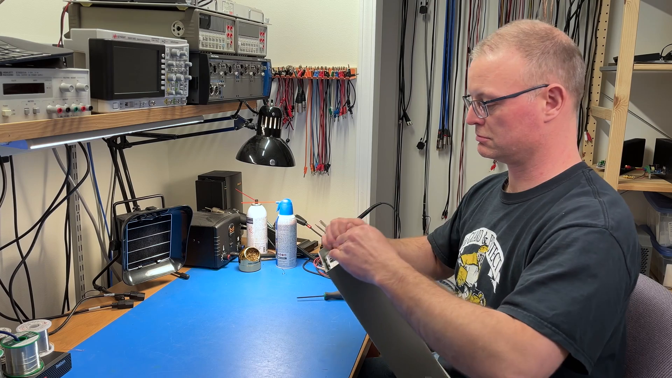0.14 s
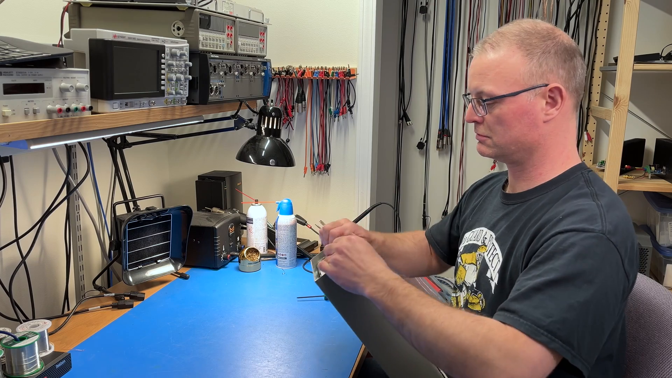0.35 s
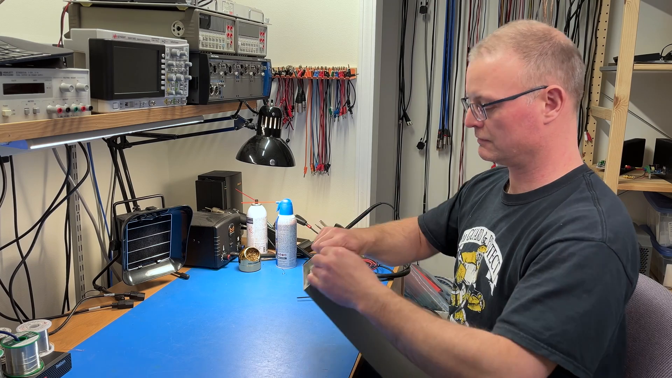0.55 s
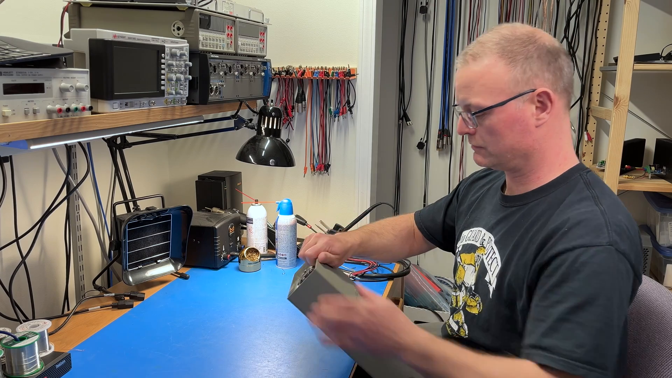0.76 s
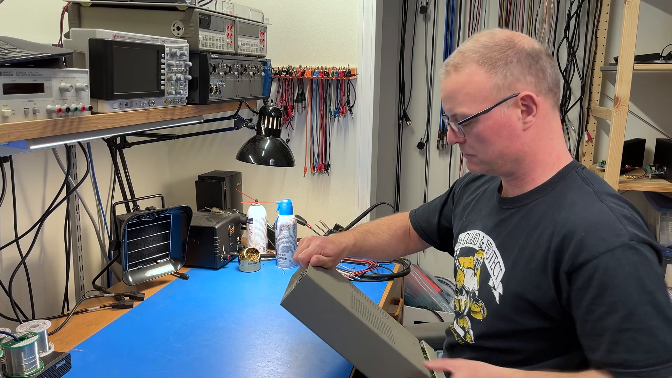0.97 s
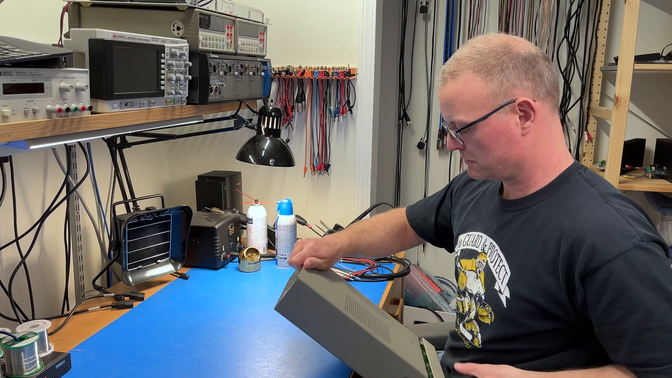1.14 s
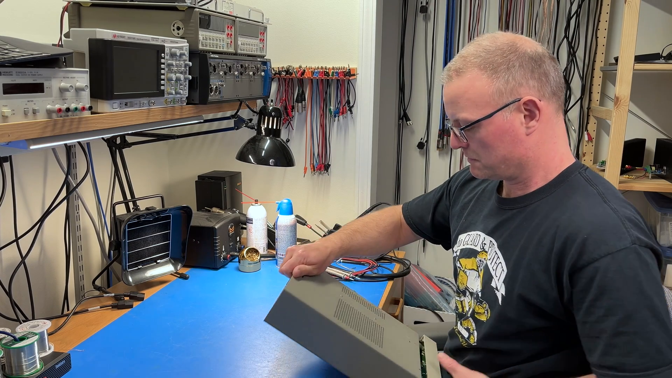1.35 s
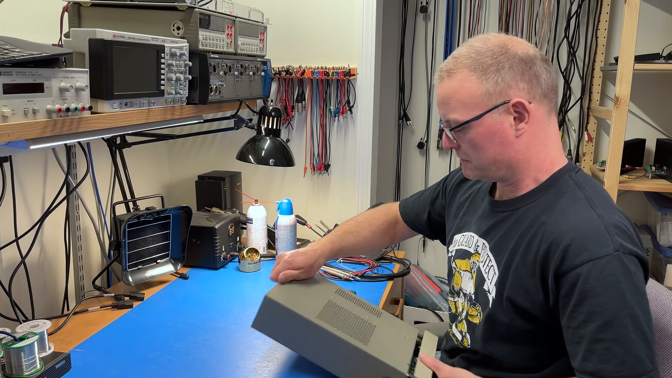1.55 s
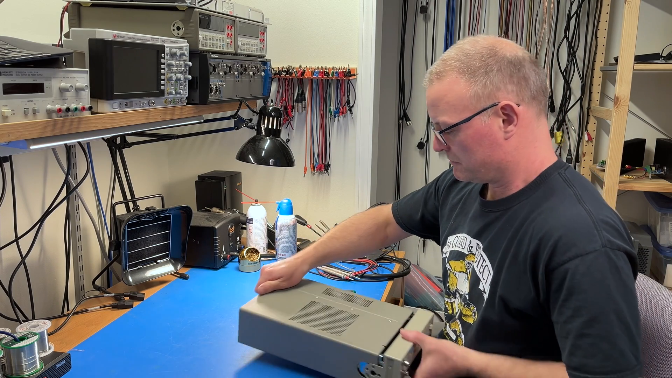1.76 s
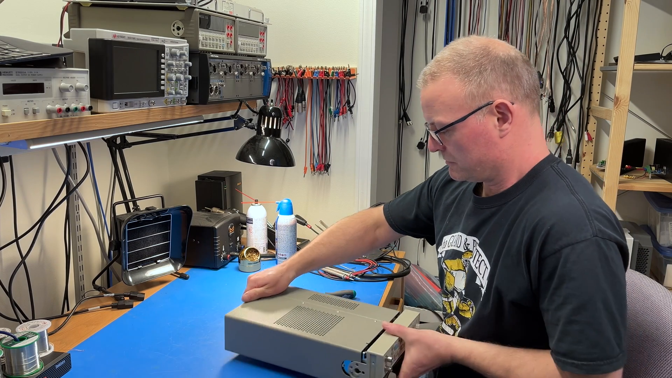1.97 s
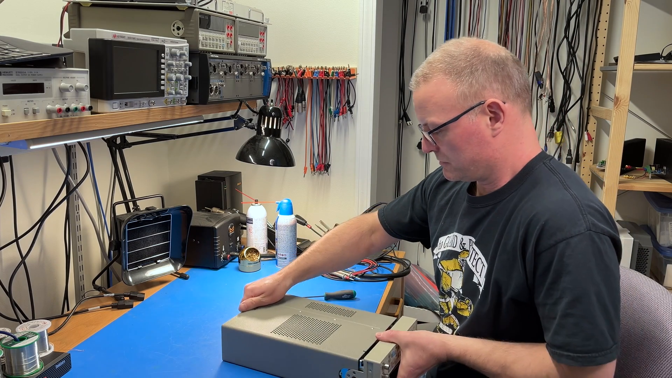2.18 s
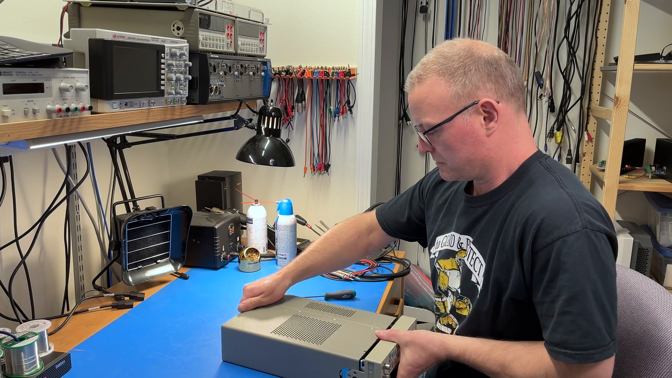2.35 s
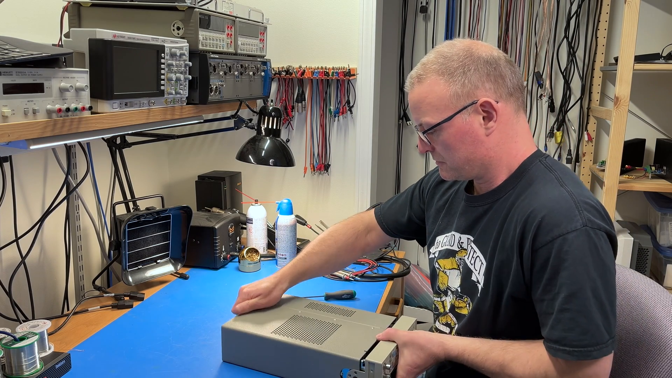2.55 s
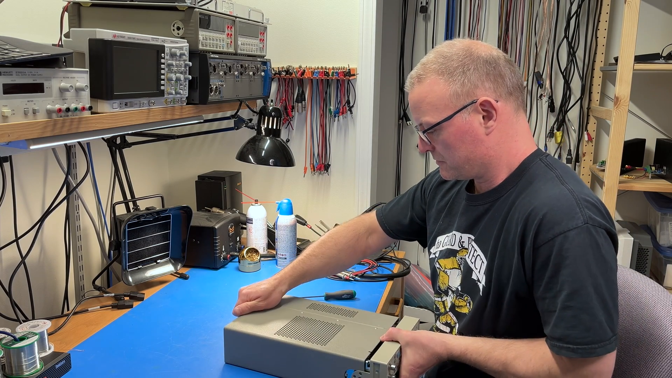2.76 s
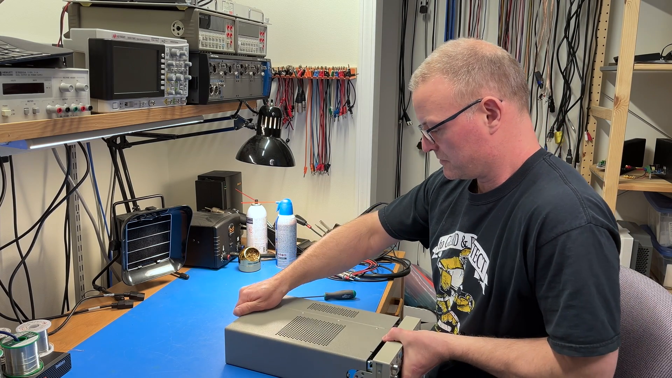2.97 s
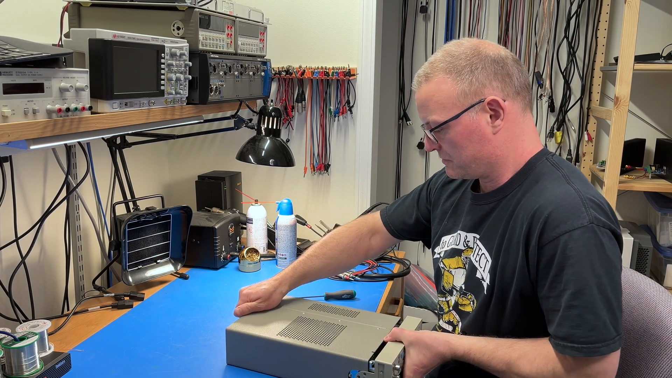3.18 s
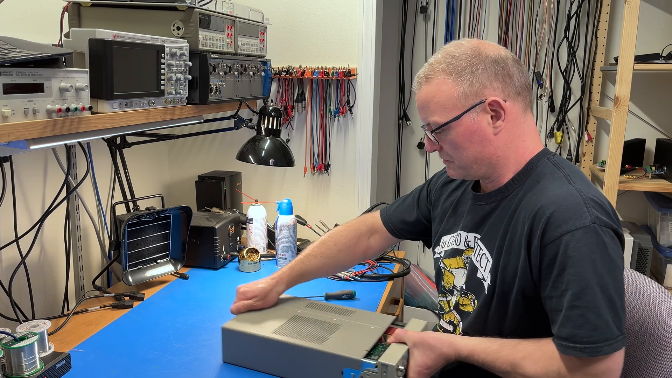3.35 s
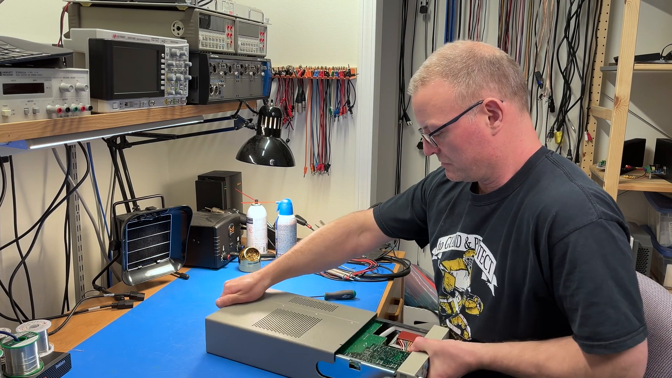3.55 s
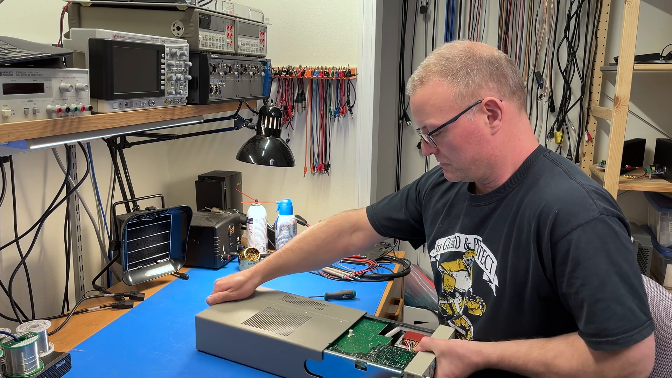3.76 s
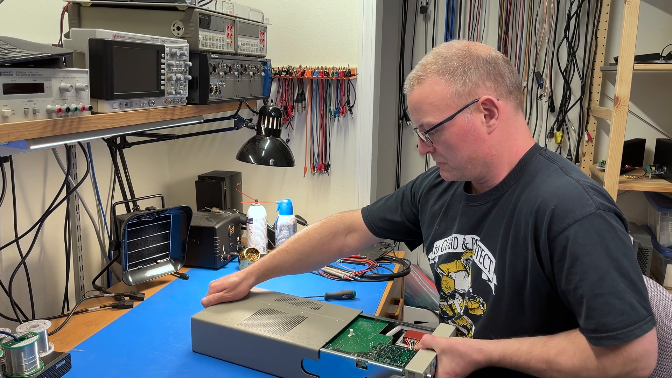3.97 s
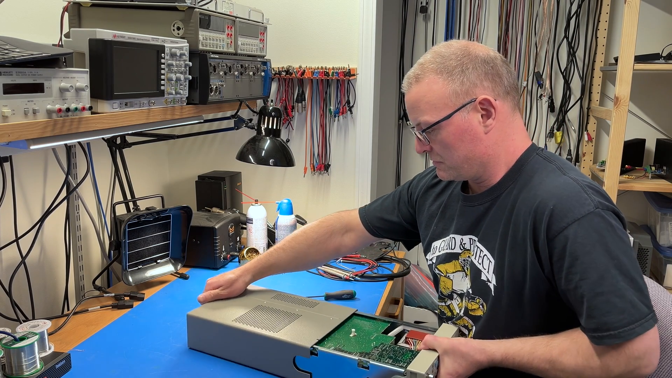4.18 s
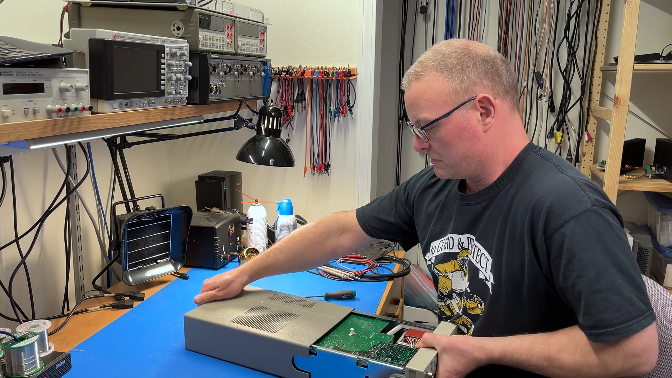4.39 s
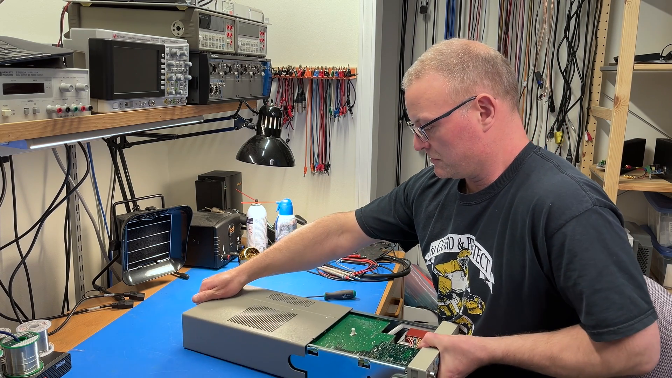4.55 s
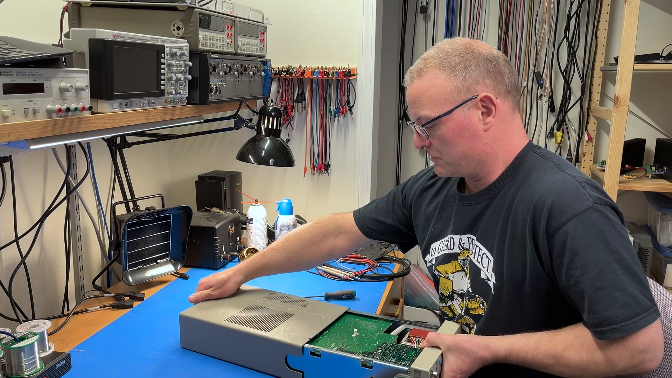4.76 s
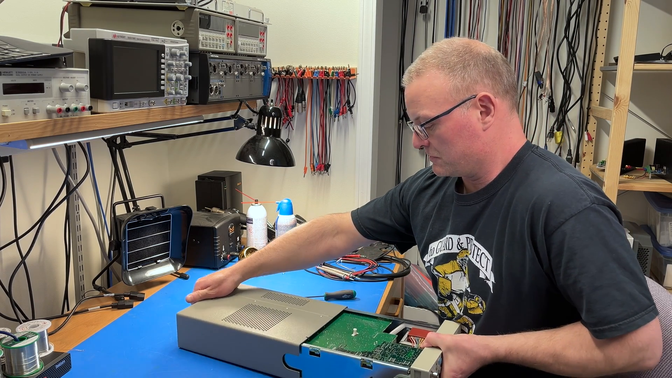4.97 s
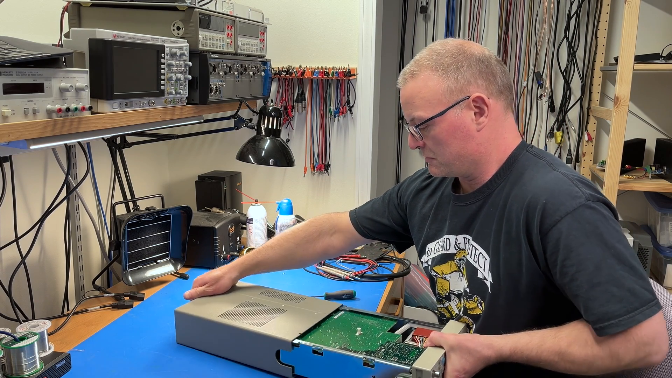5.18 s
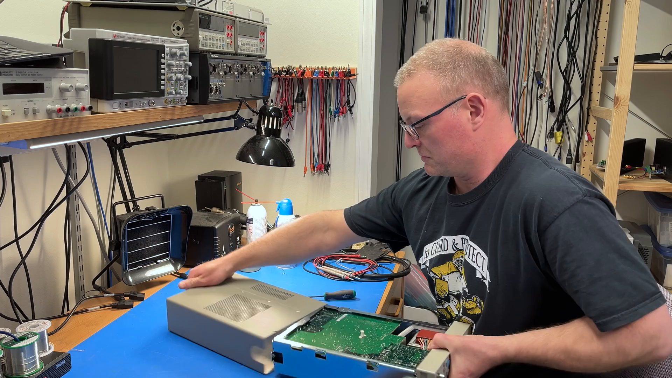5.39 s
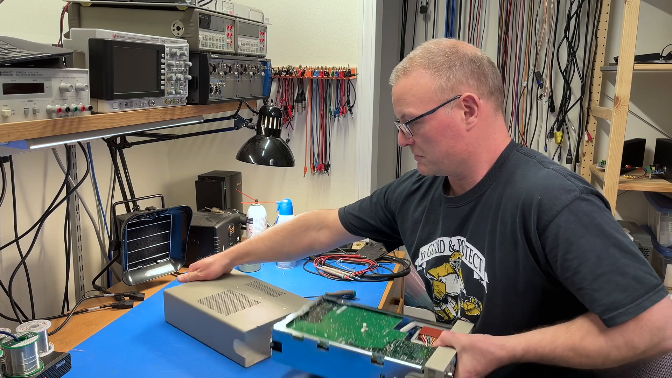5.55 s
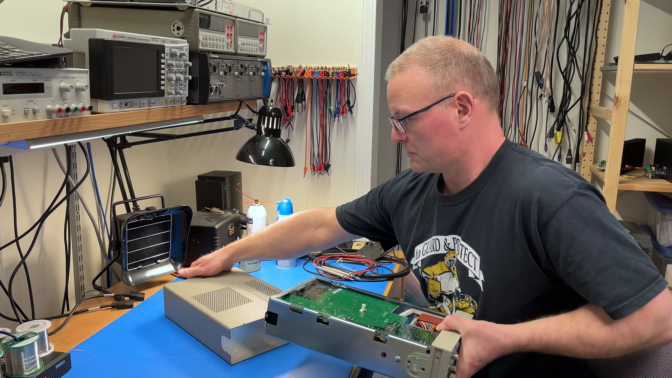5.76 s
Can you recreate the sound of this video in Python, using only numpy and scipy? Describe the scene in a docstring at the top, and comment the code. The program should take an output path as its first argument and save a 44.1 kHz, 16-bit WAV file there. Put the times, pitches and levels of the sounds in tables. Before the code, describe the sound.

A thin sheet-metal instrument cover is handled, set on a workbench, then scraped off its chassis in short, clattering jerks.

```python
"""A small cluttered room with a workbench: a sheet-metal cover is handled, laid down on the bench
and pulled off its chassis in short jerks, with one squeal of a caught edge.
Knocks and dense rubbing grains excite the modes of one body: bench, hollow box, walls, panel and edge.
Fingertips brush the skin as filtered noise, and sharp knocks add short bright cracks.
A decaying noise tail answers as the room; faint hiss and a very low rumble lie below."""
import sys
import numpy as np
from scipy import signal
from scipy.fft import rfft, irfft
from scipy.io import wavfile

SR = 44100
rng = np.random.default_rng(int(sys.argv[2]) if len(sys.argv) > 2 else 0)


def volts_from_decibels(level):
    """Turn decibel levels (scalar or array-like) into linear amplitude factors."""
    exponent = np.asarray(level, float) / 20
    return 10 ** exponent


def master(y):
    """Save y as 16-bit WAV."""
    cut = np.clip(np.atleast_2d(y).T, -1, 1)
    pcm = np.round(cut * 32767)  # scale
    wavfile.write(sys.argv[1], SR, pcm.astype(np.int16))


N = 256838
STEP = 40   # samples between the points of slow curves

# Knocks on the cover. Each row: time in seconds, click level in dB, thump level in dB,
# sharpness of the click in dB; the levels hold before each part takes its share.
KNOCKS = [(0.063, -39.5, -46, -5), (0.153, -65, -50, 4), (0.218, -43.5, -52.5, -4), (0.229, -48, -69, -2),
          (0.297, -47, -56.5, 10), (0.344, -62, -60, 19.5), (0.38, -51, -62, 9), (0.445, -62, -56, 16.5),
          (0.479, -63, -61, 8), (0.567, -44, -73, -4), (0.596, -54, -59, 9), (0.674, -62, -60, -3),
          (0.703, -43.5, -27.5, 3), (0.958, -57.5, -80, 2), (1.015, -55, -65, -9),
          (1.085, -45.5, -53.5, -5), (1.389, -59.5, -54.5, 11), (1.588, -38, -30.5, -2),
          (1.906, -46.5, -54, 2), (1.998, -65.5, -49.5, 10), (2.14, -39.5, -28.5, 6),
          (2.163, -38.5, -54, 0), (2.195, -46, -59, 2.5), (2.295, -65.5, -59, 10), (2.341, -51, -77, -6),
          (2.37, -48, -45, -5), (2.419, -44, -71, -5), (2.49, -50.5, -54, -8), (2.627, -48, -47, 0),
          (2.847, -59, -53, -6), (2.912, -76, -63, -5), (2.957, -46.5, -52, -12), (2.991, -50, -58.5, -9),
          (3.103, -55, -62, -9), (3.285, -35, -28.5, 0), (3.333, -31, -22.5, -17), (3.361, -20, -22, 2.5),
          (3.395, -26, -49, 4.5), (3.449, -31.5, -57, -25), (3.479, -31.5, -35, 1),
          (3.535, -55.5, -35, 20.5), (3.554, -66, -50, 8), (3.637, -43.5, -41.5, -2),
          (3.712, -26.5, -37, 14), (3.728, -66, -34.5, 0), (3.763, -32, -38.5, 3), (3.83, -49, -44.5, 6),
          (4.025, -43, -37.5, -25), (4.056, -40, -40, 2.5), (4.096, -34.5, -38.5, -2.5),
          (4.249, -58, -56, -9), (4.324, -60, -63, 4), (4.387, -62, -56.5, 4), (4.432, -48, -41, 3),
          (4.47, -31, -38, 2), (4.605, -70, -45, -4), (4.64, -49, -62, 7.5), (4.692, -73, -53, 5),
          (4.863, -36, -39.5, 0.5), (4.967, -59, -76, 2), (5.073, -43, -39, 9), (5.125, -46, -42, -1),
          (5.208, -53, -36.5, 9), (5.253, -30.5, -33.5, 2), (5.281, -30.5, -23, -2),
          (5.355, -31.5, -30.5, 4), (5.368, -32, -36, 10), (5.446, -65, -33.5, -10),
          (5.598, -49.5, -70, -19), (5.67, -60, -77, 3), (5.801, -54, -61, -1)]
# Hands shifting on the case. Each row: start in seconds, length in seconds, rubbing level in dB before
# each part takes its share, change along the way in dB, fingertip noise level in dB before its flicker.
HANDLING = [(0.03, 0.43, -60, -9, -65), (0.563, 0.044, -67, -1, -69.5), (0.965, 0.065, -65.5, 1.5, -73),
            (1.15, 0.53, -68.5, 1, -80.5), (1.764, 0.053, -63, -6.5, -75), (1.864, 0.4, -73.5, 0, -83),
            (2.38, 0.28, -66.5, -0.5, -85), (2.872, 0.13, -76, -12, -102), (5.566, 0.12, -62.5, -1.5, -90)]


def rms_one(x):
    """Normalization: a signal divided by its root mean square has unit power."""
    return x / np.sqrt(np.mean(x ** 2) + 1e-20)


def colour(x, points):
    """Spectral shaping: weights in dB, interpolated over log frequency, colour a noise of rms 1."""
    hz = np.maximum(np.arange(N // 2 + 1) * SR / N, 1)
    point_hz, point_db = np.transpose(points)
    shape_db = np.interp(np.log(hz), np.log(point_hz), point_db)
    return rms_one(irfft(rfft(x) * volts_from_decibels(shape_db), N))


def band(x, low_hz, high_hz):
    """Band limitation: a steep Butterworth filter passes only the range between two corners."""
    sos = signal.butter(3, [low_hz, high_hz], "band", fs=SR, output="sos")
    return signal.sosfilt(sos, x)


def drift(rate_hz):
    """Slow random fluctuation: white noise through two equal low-pass poles, scaled to rms 1."""
    r = np.exp(-2 * np.pi * rate_hz * STEP / SR)
    white = rng.standard_normal(N // STEP + 1002)
    slow = signal.lfilter([1], [1, -2 * r, r * r], white)[1000:]   # drop the filter's start
    return np.interp(np.arange(N) / STEP, np.arange(len(slow)), rms_one(slow))


def strokes(starts, lengths, levels_db, changes_db, rise_db_per_s, fall_db_per_s):
    """Energy addition: movements rise, run on a slope and fall in dB, and their powers add to one gain."""
    t = np.arange(0, N + STEP, STEP)[:, None] / SR
    along = np.clip((t - starts) / np.maximum(lengths, 1e-3), 0, 1)
    before_db = rise_db_per_s * np.maximum(starts - t, 0)
    after_db = fall_db_per_s * np.maximum(t - starts - lengths, 0)
    power = volts_from_decibels(2 * (levels_db + changes_db * along - before_db - after_db)).sum(axis=1)
    return np.interp(np.arange(N) / SR, t[:, 0], np.sqrt(power))


def ring(force, hz, t60):
    """Modal resonance: a steady noisy force gives the same power whatever the pitch or decay."""
    r, w = volts_from_decibels(-60 / (t60 * SR)), 2 * np.pi * hz / SR
    gain = 2 * np.sin(w) * np.sqrt(1 - r)
    return signal.lfilter([0, gain], [1, -2 * r * np.cos(w), r * r], force + 1e-18)


def blows(starts, contact_s):
    """Impact: each knock is a single push and a chatter gain that swells quickly and dies exponentially."""
    rise = np.exp(-1 / (0.00094 * SR))   # rise time 0.94 ms
    swell = signal.lfilter([1 - rise], [1, -rise], starts + 1e-18)
    chatter = signal.lfilter([1], [1, -np.exp(-1 / (contact_s * SR))], swell)
    return chatter, starts * np.sqrt(contact_s * SR)


def rumble():
    """Infrasonic noise: a narrow random band near the lower limit of hearing, slowly changing in level."""
    # Level of the rumble. Each row: time in seconds, level in dB.
    rumble_curve = [(0, -54), (1.7, -57.5), (2.2, -64), (3, -61.5), (5.82, -70)]
    s, level_db = np.transpose(rumble_curve)
    gain = volts_from_decibels(np.interp(np.arange(N) / SR, s, level_db))
    return gain * rms_one(band(rng.standard_normal(N), 7.7, 22.3))


def hiss():
    """Stationary noise: a steady random signal is known by its spectrum and overall level."""
    # Relative spectrum of the hiss. Each row: frequency in Hz, density in dB per Hz.
    hiss_spectrum = [(20, -15.5), (55, -8.5), (100, -11), (200, -18.5), (500, -25.5), (1000, -27),
                     (3000, -34), (5000, -39), (16000, -42.5)]
    return volts_from_decibels(-67) * colour(rng.standard_normal(N), hiss_spectrum)


def room(x):
    """Reverberation: a dense noise tail of unit energy decays exponentially, duller as it goes."""
    t60_s, wall_cut_hz, onset_s = 0.27, 2700, 0.017
    t = np.arange(round(.5 * SR)) / SR
    decay = volts_from_decibels(-60 * t / t60_s)
    white = rng.standard_normal(len(t))
    dull = signal.sosfilt(signal.butter(1, wall_cut_hz, fs=SR, output="sos"), white)
    bright = (white - dull) * decay   # the treble dies twice as fast
    tail = (dull + bright) * decay * np.minimum(t / onset_s, 1)
    return signal.fftconvolve(x, tail / np.sqrt(np.sum(tail ** 2)))[:N]


def fingers():
    """Soft friction: fingertips brush the painted skin as bright noise whose level flickers."""
    rise_db_per_s, lift_db_per_s, flicker_db = 500, 408, 5
    s, length, _, change_db, db = np.transpose(HANDLING)
    brush = strokes(s, length, db, change_db, rise_db_per_s, lift_db_per_s)
    noise = rms_one(band(rng.standard_normal(N), 6300, 14000))
    return brush * volts_from_decibels(flicker_db * drift(24.8)) * noise


def squeak():
    """Stick-slip: fast, slightly uneven slips ring one short mode while the edge is caught."""
    slips_per_s, mode_hz, t60_s = 230, 3190, 0.014
    turns = np.cumsum(slips_per_s * (1 + 0.12 * drift(65))) / SR
    slips = np.diff(np.floor(turns), prepend=0) * volts_from_decibels(rng.normal(0, 1.8, N))
    # start s, hold s, dB before the band-pass, slope dB, rise dB/s, fall dB/s
    caught = strokes(3.664, .007, -33, 0, 1500, 900)
    return band(caught * rms_one(ring(slips, mode_hz, t60_s)), 2700, 3500)


def cracks():
    """Brief hard contact: each knock starts with a short bright noise, stronger the sharper its click."""
    crack_db, db_per_sharpness, contact_s = -23, 1.8, .002
    s, click_db, _, sharp_db = np.transpose(KNOCKS)
    starts = np.zeros(N)
    starts[np.round(s * SR).astype(int)] = volts_from_decibels(click_db + crack_db + db_per_sharpness * sharp_db)
    chatter, _ = blows(starts, contact_s)
    return chatter * rms_one(band(rng.standard_normal(N), 6800, 13200))


def grains():
    """Rough-surface friction: tiny random catches, bunched by stick and slip, make a force of rms 1."""
    grains_per_s, spread_db, slip_db = 2200, 1, 2.5
    sizes = volts_from_decibels(spread_db * np.minimum(rng.exponential(1, N), 5)) * rng.choice([-1, 1], N)
    present = rng.random(N) < grains_per_s / SR
    return rms_one(sizes * present * volts_from_decibels(slip_db * drift(22.0)))


def catches():
    """Poisson process: sparse random snags of the sliding edge, scattered in size."""
    catches_per_s, typical_db, spread_db = 45, -0.5, 4.5
    present = rng.random(N) < catches_per_s / SR
    return present * volts_from_decibels(typical_db + spread_db * rng.standard_normal(N))


def rubbing(k):
    """Frictional drive: hands and pulls share their force among the parts; the heavy bench settles slowly."""
    # The cover slides along the chassis in jerks. Each row: start in seconds, length in seconds, level in
    # dB before each part takes its share, change along the way in dB, pressure on the box in dB.
    pull_rows = [(3.271, 0.038, -43, 8.5, 1.5), (3.324, 0.079, -38.5, 4.5, -0.5),
                 (3.437, 0.083, -43.5, -3, 1.5), (3.63, 0.035, -57, 6, 1.5), (3.682, 0.017, -48, 8, 4),
                 (3.718, 0.22, -48.5, -17, 3), (4.023, 0.082, -48, 1, 2), (4.113, 0.16, -68.5, 1, 5.5),
                 (4.43, 0.12, -54, 4.5, 2), (4.616, 0.041, -61, 12.5, 4), (4.863, 0.03, -50.5, -9.5, 5),
                 (4.995, 0.077, -45.5, 0, 3), (5.123, 0.093, -51.5, 4.5, 2), (5.263, 0.052, -44, 9.5, 2.5),
                 (5.325, 0.045, -40, 3, -0.5), (5.393, 0.058, -49.5, -12.5, 15.5)]
    # Share of hands and of pulls in each part, in dB: bench, box, walls, panel, edge.
    hand_share_db = [-17, -10, -6.5, -2, -4.5]
    pull_share_db = [-22, -9.5, -4.5, -1.5, -3]
    # How much the pressure counts in each part, in dB per dB.
    pressure_weight = [1, 1, 1, -1, -1.44]
    s, length, db, change_db, _ = np.transpose(HANDLING)
    hands = strokes(s, length, db + hand_share_db[k], change_db, 500, 202)   # rise, fall in dB/s
    s, length, db, change_db, pressure_db = np.transpose(pull_rows)
    level_db = db + pull_share_db[k] + pressure_weight[k] * pressure_db
    fall_db_per_s = 228 if k else 54.5   # part 0 is the bench
    pulls = strokes(s, length, level_db, change_db, 1800, fall_db_per_s)
    return np.hypot(hands, pulls)


def struck(k):
    """Impulsive excitation: the click and thump of every knock add in power as impulses on one part."""
    # Share of click and of thump in each part, in dB: bench, box, walls, panel, edge.
    click_share_db = [-23.5, -20, -6.5, 0, -11]
    thump_share_db = [-17.5, -0.5, -12.5, -33, -40]
    # How much the sharpness counts in each part, in dB per dB.
    sharpness_weight = [0, 0.07, 0, 0, 0.72]
    s, click_db, thump_db, sharp_db = np.transpose(KNOCKS)
    click = volts_from_decibels(click_db + click_share_db[k] + sharpness_weight[k] * sharp_db)
    thump = volts_from_decibels(thump_db + thump_share_db[k])
    starts = np.zeros(N)
    starts[np.round(s * SR).astype(int)] = np.hypot(click, thump)
    return starts


def thuds(hz):
    """Modal coupling: a landing drives a mode less the further it lies from the pitch the spot favours."""
    # The weight of the case lands on the bench. Each row: time in seconds, level in dB before
    # the common gain, frequency in Hz that the spot favours.
    landings = [(0.705, -27.5, 200), (1.361, -51, 100), (1.389, -48, 80), (1.43, -53, 90),
                (1.999, -55, 117), (2.14, -30, 166), (2.164, -39, 140), (2.419, -52, 157),
                (3.284, -42, 89.5), (3.332, -35, 88), (3.393, -47, 100), (3.449, -41, 120),
                (3.48, -21.5, 144), (3.53, -41, 110), (3.728, -31.5, 101), (3.763, -49, 100),
                (3.831, -41.5, 250), (3.922, -50, 81), (4.025, -46.5, 173), (4.096, -49, 110),
                (4.434, -45.5, 283), (4.47, -47, 114), (4.607, -46.5, 297), (4.69, -47.5, 300),
                (5.17, -47, 250), (5.28, -61, 300), (5.382, -36, 158), (5.446, -36, 111), (5.501, -41, 80),
                (5.597, -73, 150)]
    gain_db, loss_db, contact_s = 2.5, 8, 0.0017   # loss at one octave, growing with the square
    s, db, spot_hz = np.transpose(landings)
    pushes = np.zeros(N)
    pushes[np.round(s * SR).astype(int)] = volts_from_decibels(db + gain_db - loss_db * np.log2(hz / spot_hz) ** 2)
    return pushes * np.sqrt(contact_s * SR)


def cover():
    """Modal superposition: knocks and rubbing drive each part's modes, whose shares wander with the contact."""
    # Modes of bench and cover. Each row: frequency in Hz, level in dB relative to the others of its part.
    mode_rows = [(58, -14), (80, -2), (118, -4), (172, -4.5), (243, -4.5), (322, 6.5), (350, -4), (465, -7),
                 (505, 4), (530, 6.5), (575, 2.5), (620, -1), (740, 11.5), (786, -19), (860, 4), (975, 5),
                 (1155, 0), (1370, -1.5), (1650, -7.5), (1920, -7), (2200, -2.5), (2490, -0.5), (2790, 2.5),
                 (3020, 4), (3200, -2.5), (3400, -7), (3860, -7), (4800, 0.5), (5600, -6.5), (6200, -4.5)]
    # Bench, box, walls, panel, edge. Each row: lowest frequency in Hz, highest frequency in Hz, level of
    # the dense unresolved modes in dB on the scale of the modes, contact time in seconds, knock level
    # in dB, t60 in seconds at the part's middle frequency.
    part_rows = [(59.3, 328, -26, 0.0021, -2, 0.16), (396, 677, -19.5, 0.0032, 2, 0.056),
                 (744.9, 1647, 5, 0.013, -0.5, 0.025), (1840, 4640, 4, 0.0087, 2, 0.011),
                 (4600, 15000, 15, 0.0066, 3.5, 0.068)]
    # Relative colour of the dense modes. Each row: frequency in Hz, density in dB per Hz.
    dense_spectrum = [(40, -26.5), (250, 14.5), (520, -34.5), (1000, -14.5), (2000, -2), (3000, 1),
                      (4200, -9.5), (6000, -13.5), (9000, -23), (16000, -34.5)]
    wander_db = 3
    rough, snags, out = grains(), catches(), np.zeros(N)
    dense_rub = colour(rough, dense_spectrum)
    dense_knock = colour(rng.standard_normal(N), dense_spectrum)
    for k, (low_hz, high_hz, dense_db, contact_s, knock_db, t60) in enumerate(part_rows):
        rub, part = rubbing(k), np.zeros(N)
        # each snag is a small knock sized by the rubbing force
        chatter, push = blows(volts_from_decibels(knock_db) * struck(k) + rub * snags, contact_s)
        modes = [m for m in mode_rows if low_hz <= m[0] < high_hz]
        total = np.sqrt(sum(volts_from_decibels(2 * m[1]) for m in modes) + volts_from_decibels(2 * dense_db))
        gather = np.sqrt(SR / high_hz / 8)   # slow modes need more push to reach their height
        middle_hz = np.sqrt(low_hz * high_hz)
        for j, (hz, level_db) in enumerate(modes):
            rattle = hz / (hz + 900)   # low modes feel one clean push, high modes the chatter
            clean = 0.77 * (1 - rattle) * (-1) ** j * (push + thuds(hz))   # neighbours in opposite sign
            rough_knock = 0.95 * rattle * chatter * rng.standard_normal(N)
            force = volts_from_decibels(wander_db * drift(9.1)) * (rub * rough + gather * (clean + rough_knock))
            mode_t60 = t60 * np.sqrt(middle_hz / hz)   # higher modes die sooner
            part += volts_from_decibels(level_db) * ring(force, hz, mode_t60)
        part = band(part, .8 * low_hz, 1.2 * high_hz)
        unresolved = rub * rms_one(band(dense_rub, low_hz, high_hz))
        unresolved += chatter * rms_one(band(dense_knock, low_hz, high_hz))
        out += (part + volts_from_decibels(dense_db) * unresolved) / total
    return out


def scene():
    """Superposition: cover, cracks, squeak and fingers with their reverberation, over hiss and rumble."""
    near = cover() + cracks() + squeak() + fingers()
    reverberant = volts_from_decibels(-9.5) * room(near)
    return (near + reverberant + hiss() + rumble())[None]


def band_limit(x):
    """A steep low-pass at the top of the band."""
    return signal.sosfilt(signal.butter(12, 16500, fs=SR, output="sos"), x)


def record(dry):
    """Single-channel transmission: the finished mix goes out through a steep low-pass at the top of the band,
    with no further gain."""
    return band_limit(dry)


dry = scene()
out = record(dry)
master(out)
```